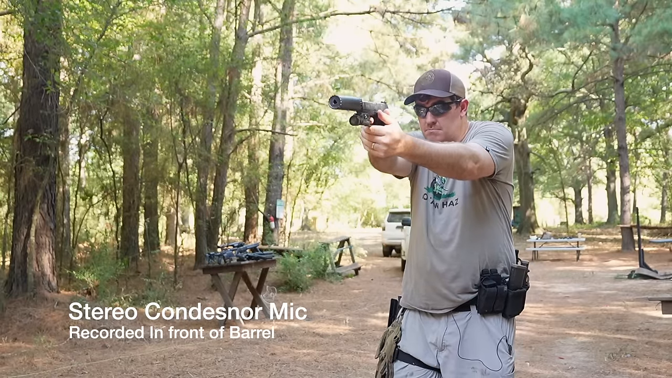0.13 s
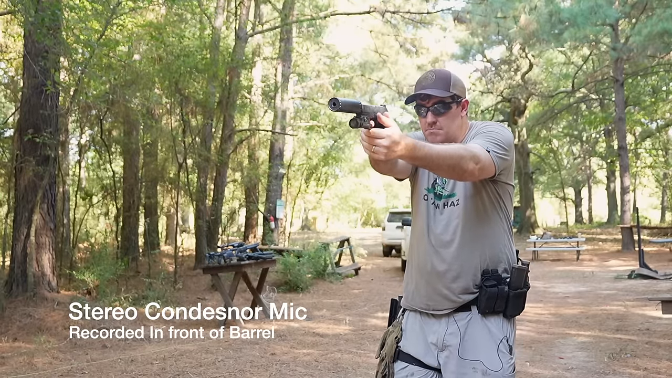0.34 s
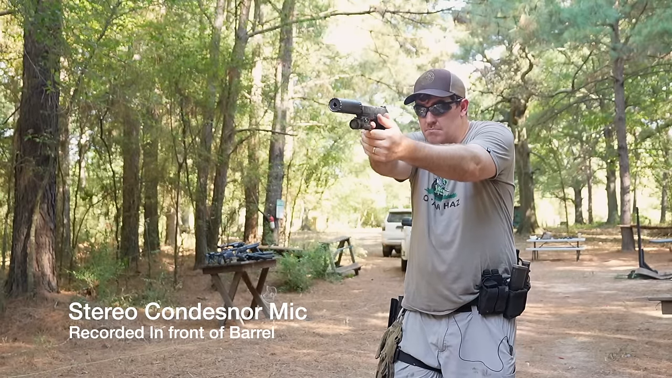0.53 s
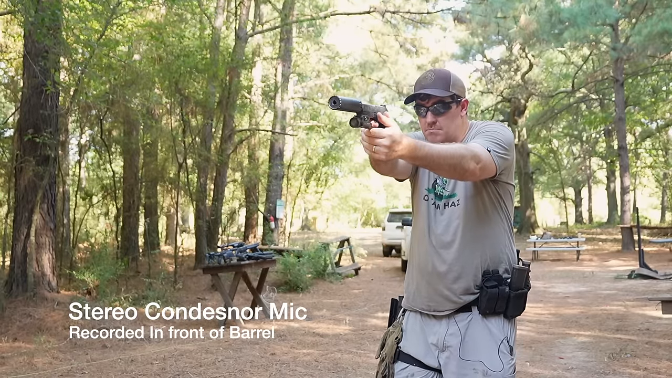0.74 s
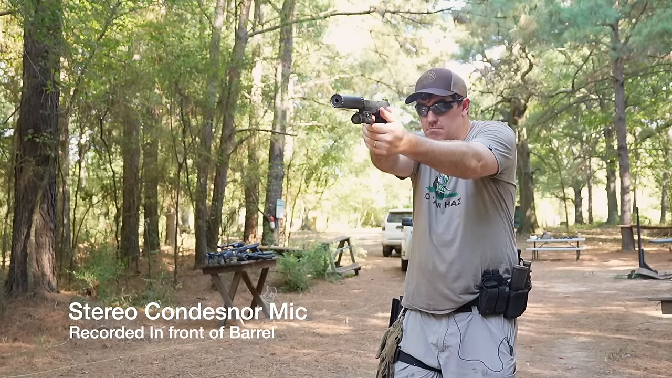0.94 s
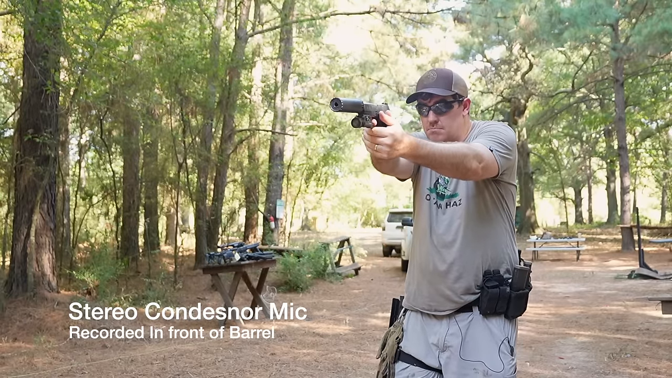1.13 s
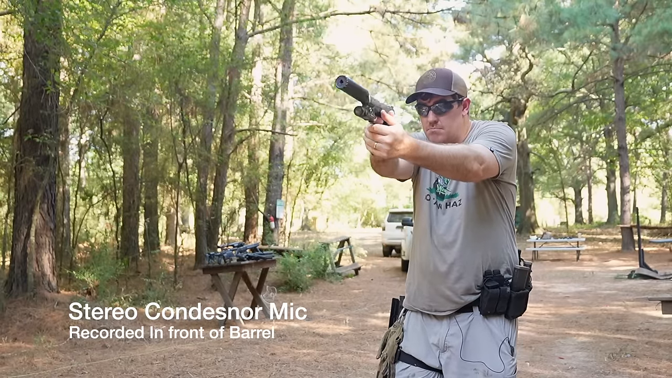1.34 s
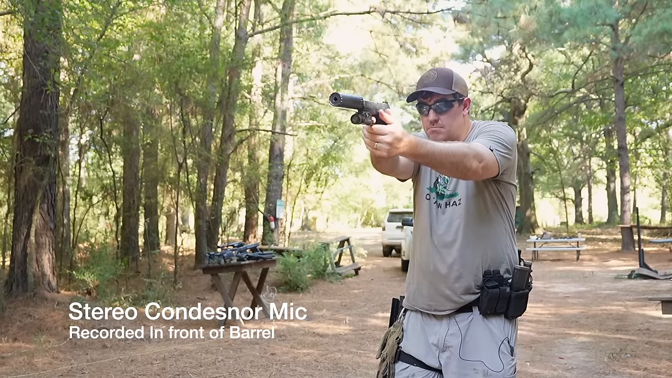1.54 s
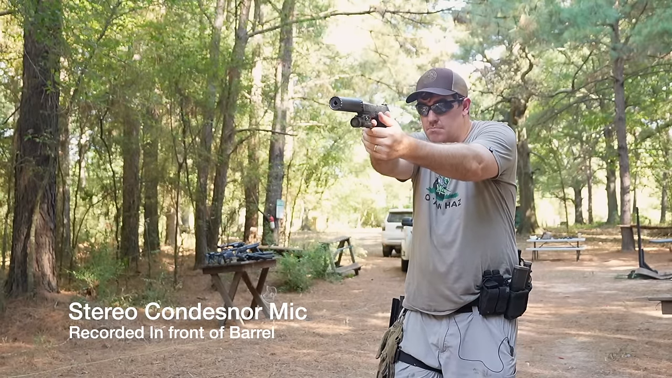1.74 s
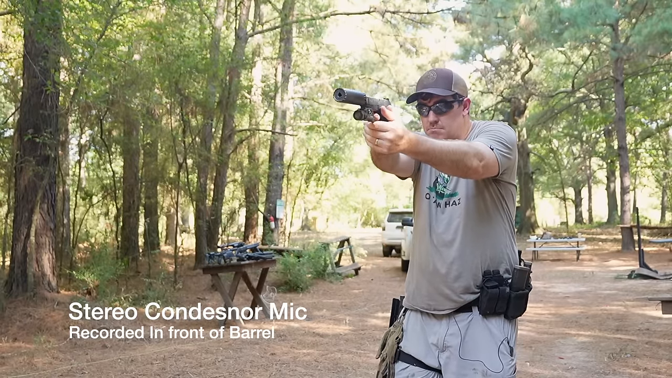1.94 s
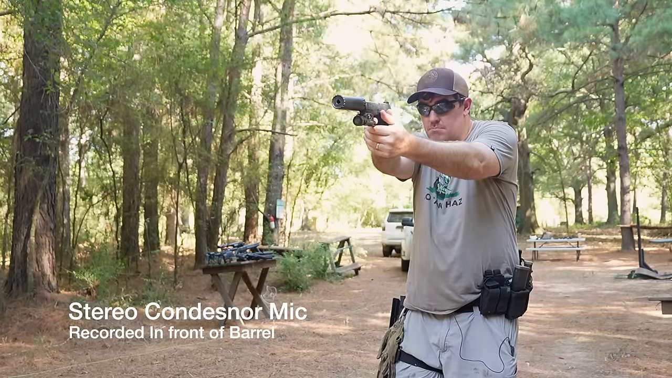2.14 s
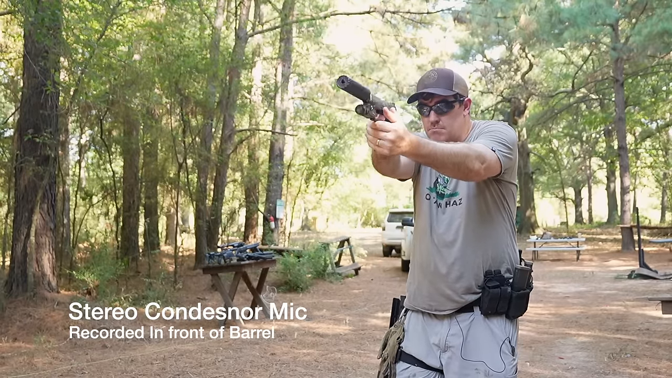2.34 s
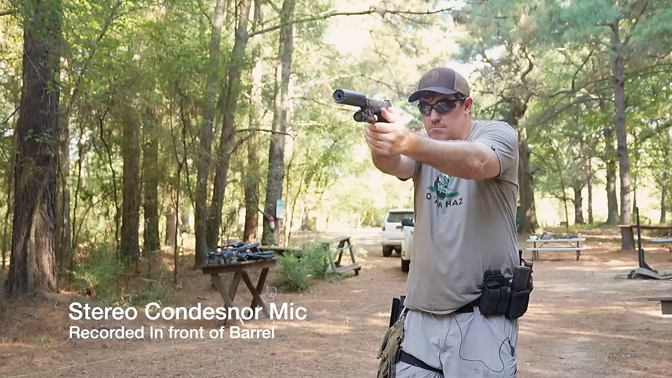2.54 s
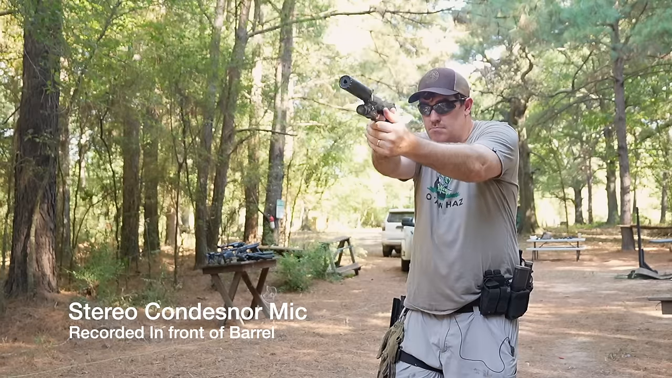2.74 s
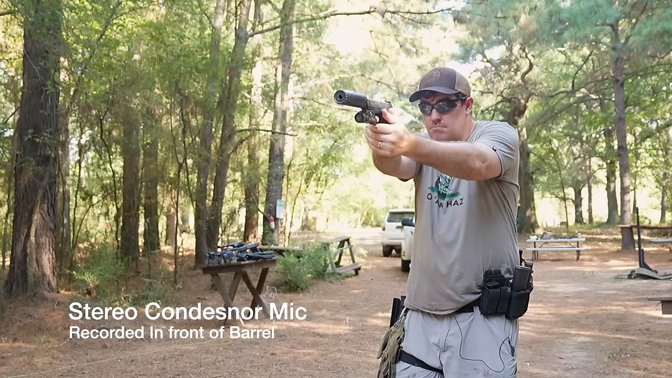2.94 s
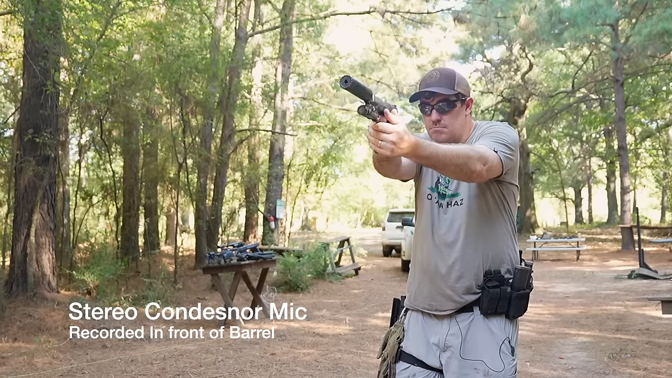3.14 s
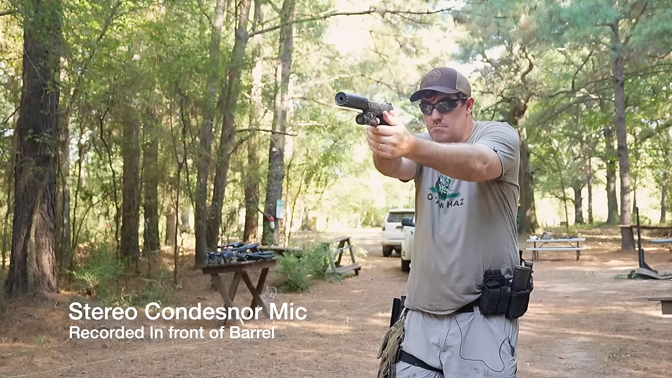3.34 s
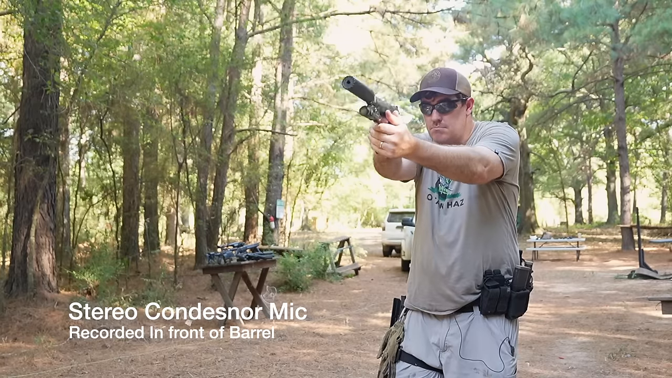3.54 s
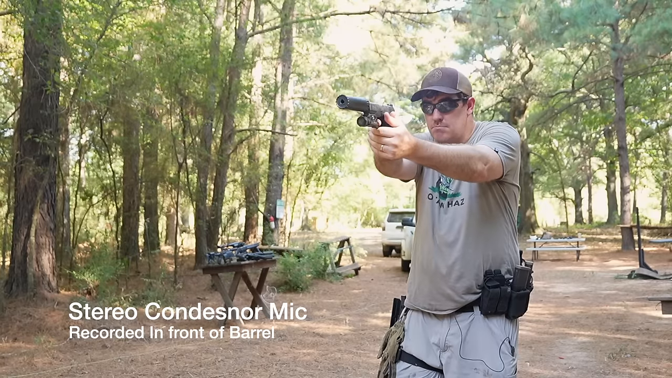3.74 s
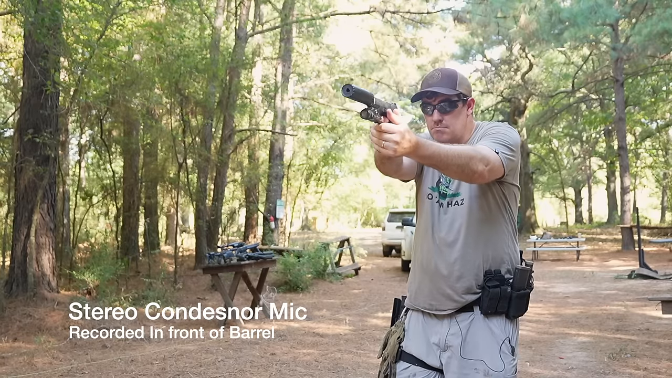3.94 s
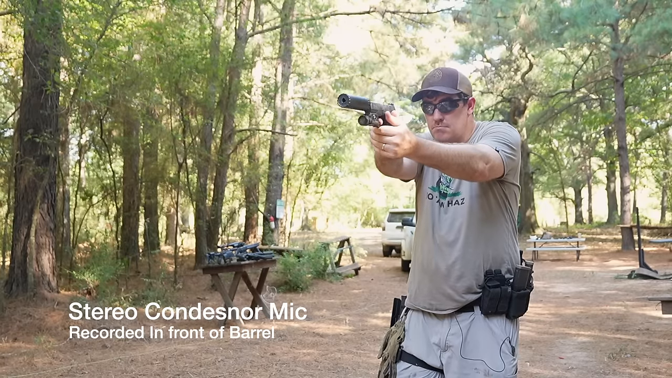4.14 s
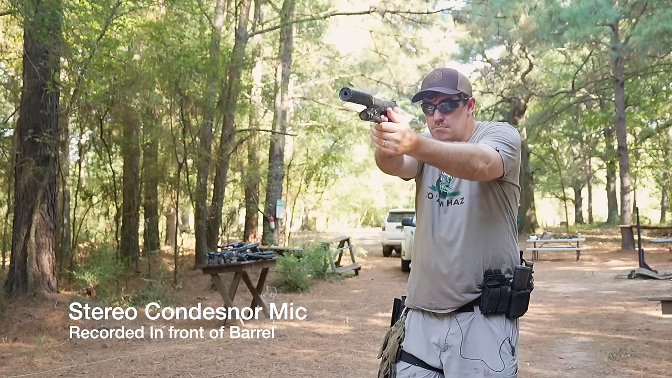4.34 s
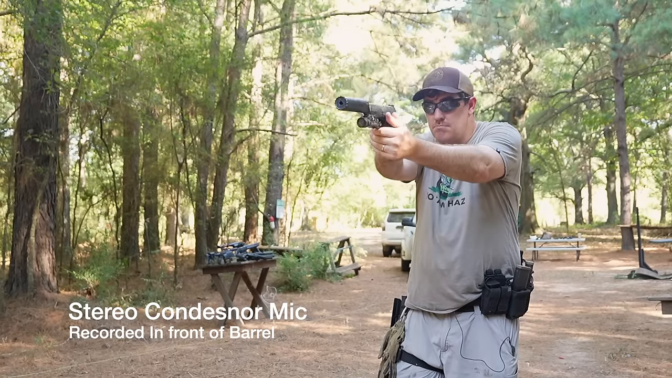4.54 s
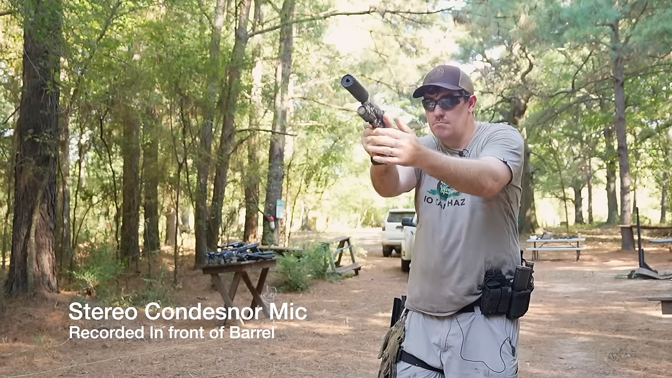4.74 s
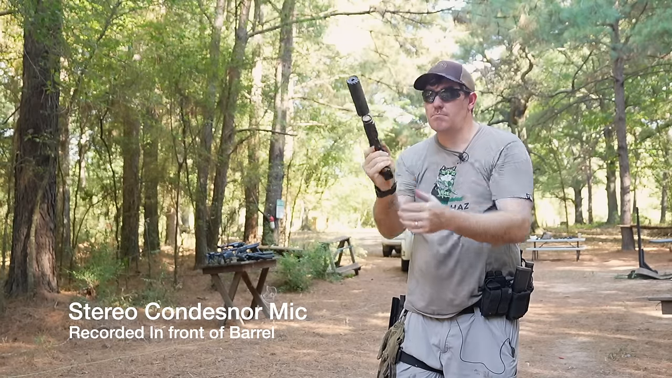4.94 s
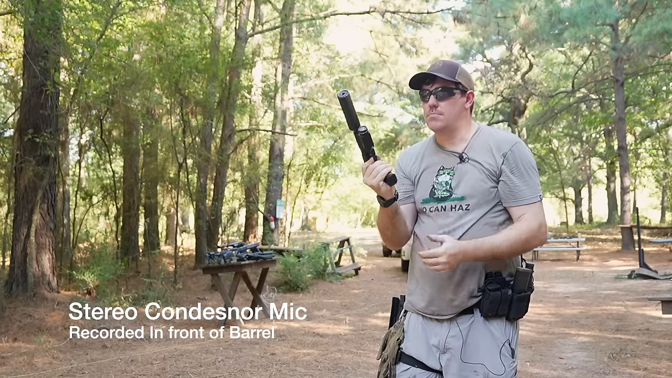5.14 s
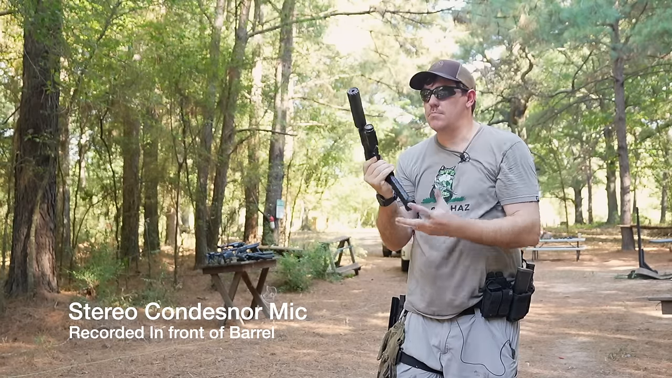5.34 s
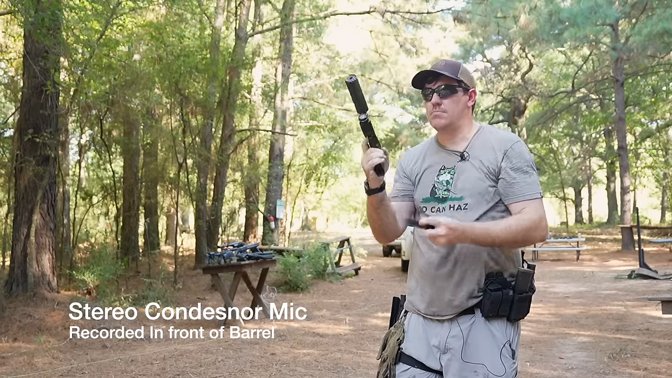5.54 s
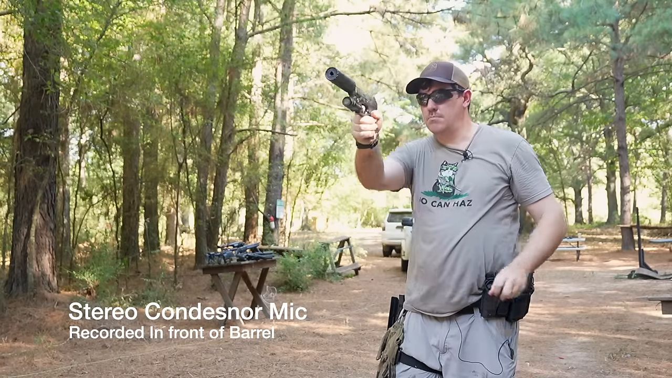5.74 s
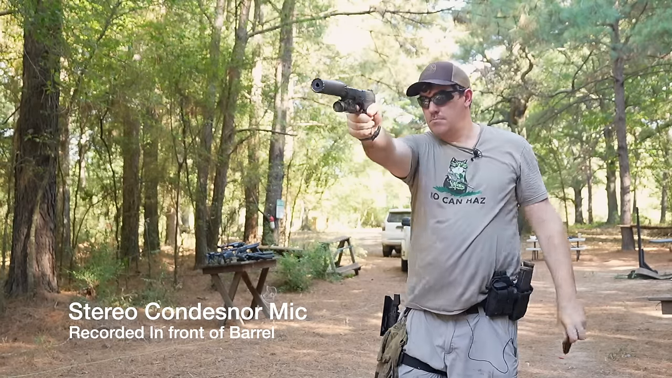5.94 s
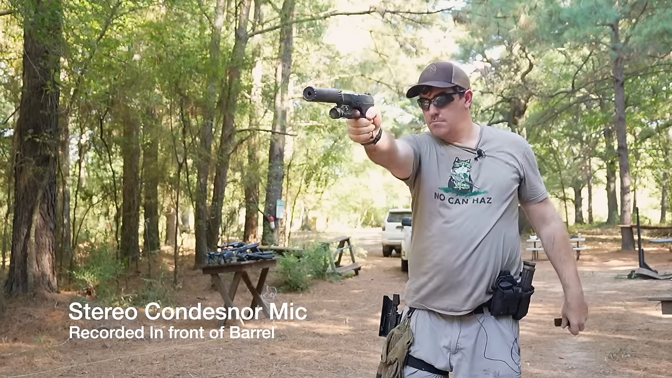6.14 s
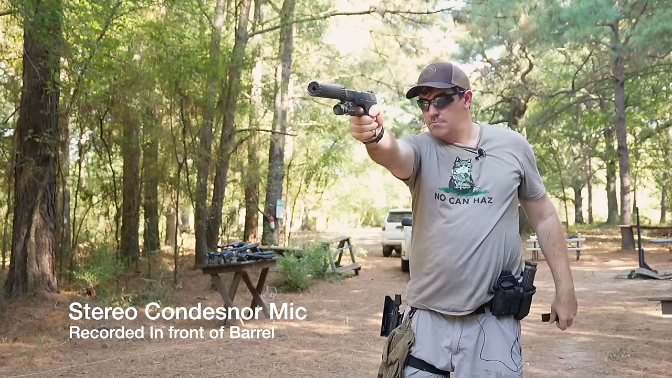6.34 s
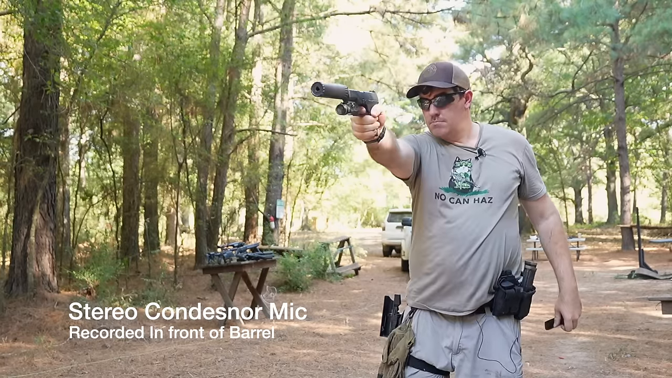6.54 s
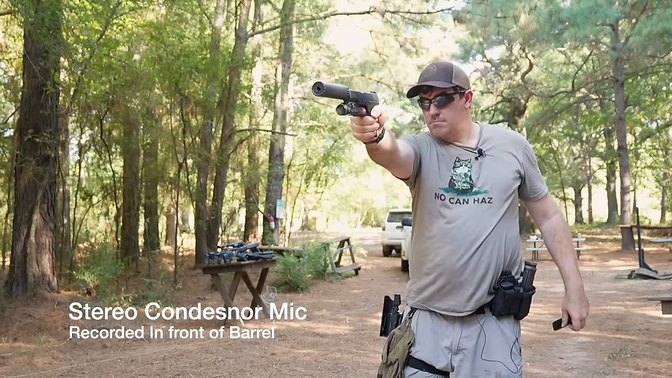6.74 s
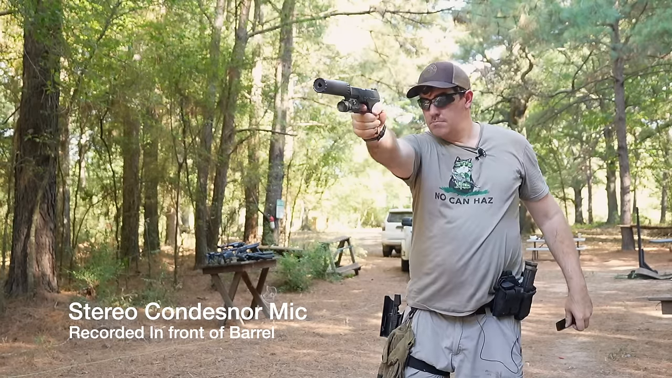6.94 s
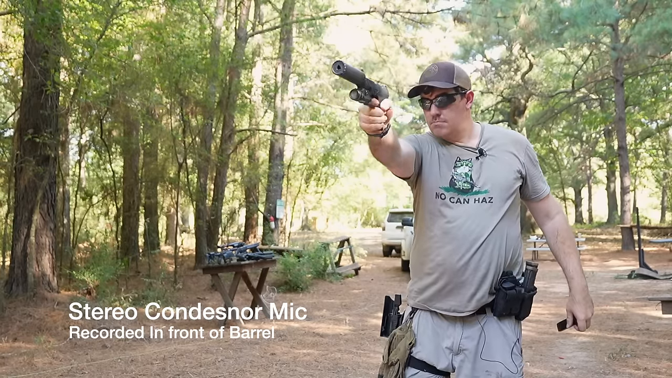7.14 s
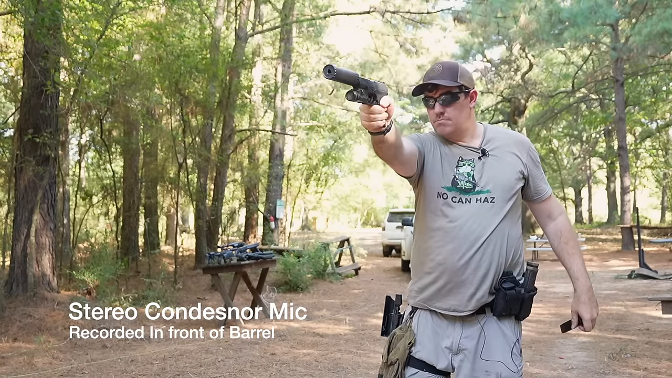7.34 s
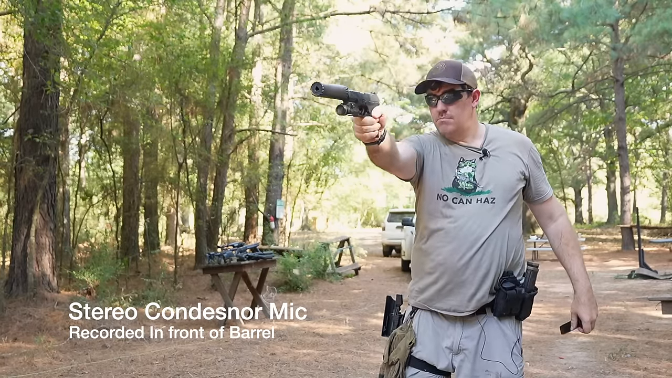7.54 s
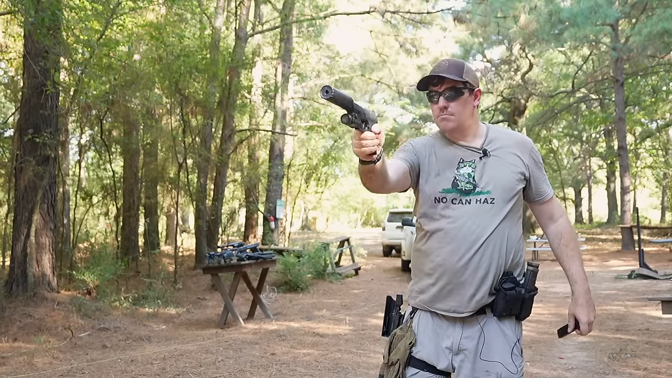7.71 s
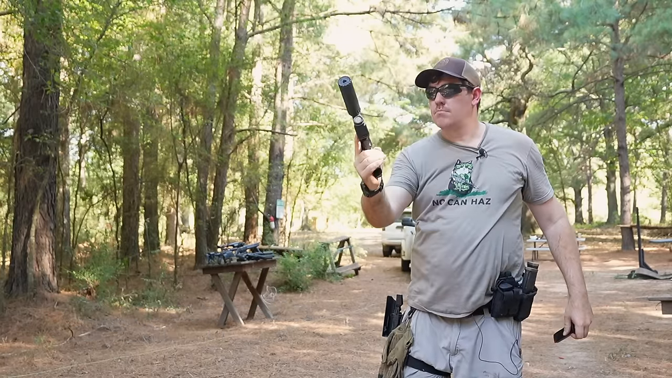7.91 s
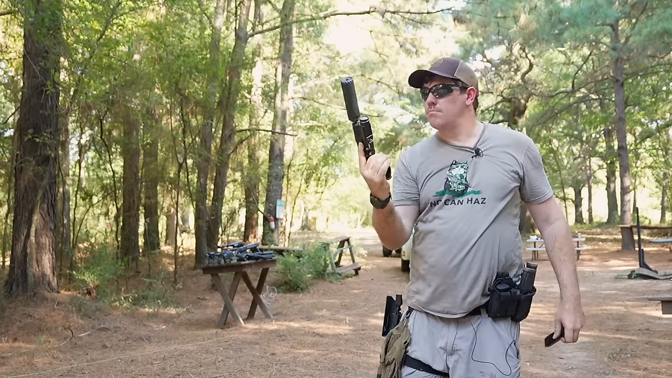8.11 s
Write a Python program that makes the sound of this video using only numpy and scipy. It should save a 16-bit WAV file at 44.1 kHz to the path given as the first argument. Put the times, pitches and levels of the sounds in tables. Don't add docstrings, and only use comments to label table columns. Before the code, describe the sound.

Very close to the microphone, a suppressed pistol fires ten shots in about four seconds. Each is a sharp burst of hissing gas over a short low thump, followed by a metallic slide clack and brief woodland echo. Faint distant impacts and trigger ticks fill gaps. Magazine clicks and a bright clack follow, then quiet with wind and faint birds, and a final shot with small rattles after it.

```python
import sys
import numpy as np
from scipy import signal
from scipy.fft import rfft, irfft
from scipy.io import wavfile
from scipy.ndimage import uniform_filter1d

SR = 44100
rng = np.random.default_rng(int(sys.argv[2]) if len(sys.argv) > 2 else 0)


def magnitude_from_level(level_db):
    exponent = np.asarray(level_db, float) / 20
    return 10 ** exponent


def unload_wav(signal):
    wavfile.write(
        sys.argv[1],
        SR,
        np.round(np.clip(np.atleast_2d(signal).T, -1, 1) * 32767).astype(np.int16),
    )


N = 360441
TIME = np.arange(N) / SR

# (time [s], blast [dB], lead-in puff [dB], echo delay [ms], case song [dB])
SHOTS = [(0.0238, -10, 1, 51, 1), (0.792, -10.5, 4.5, 43, 8), (1.3406, -11.5, 7.5, 50, 2),
         (1.8594, -13, 5.5, 50, 0), (2.322, -10, 1.5, 44, 4), (2.7256, -10.5, 1.5, 51, -7),
         (3.128, -9, -6, 44, -3.5), (3.524, -11, 1, 53, 0), (3.9022, -12.5, -6, 40, 4),
         (4.273, -10, 9.5, 64, 5.5), (7.1134, -11, 7.5, 74, -23)]
# (time [ms], level [dB], hold [ms], t60 [ms])
GAS_PUFFS = [
    (-2.2, -24, 2, 6),
    (0, 5, 1.2, 18),
    (0, 2.5, 9, 22),
    (11, -14, 2, 40),
    (15.5, -11, 1.5, 20),
    (26.5, -21, 1.5, 15),
    (31, -19, 2, 20),
]
# (frequency [Hz], level [dB per Hz])
BLAST_COLOUR = [(120, -22), (200, -10), (329, -12.5), (594, -10.5), (1320, -11), (2160, -8), (4290, -9),
                (6930, -4.5), (14200, -8.5), (15600, -6.5), (16500, -37)]
# (time [s], level [dB])
TRUNK_SLAPS = [(.2559, -41), (.9682, -40), (1.4437, -25), (1.5265, -39), (1.9608, -26), (2.091, -36),
               (2.97, -39), (3.3593, -39), (3.7558, -37), (4.1347, -38), (4.4224, -38), (7.244, -26),
               (7.3246, -39), (7.3734, -39), (7.4936, -46), (7.5481, -49)]
# (thump [dB], muzzle pop [dB])
PUSH = [(-15.5, -22.5), (-22, -23.5), (-12, -30), (-20.5, -21), (-17.5, -28.5), (-8, -25.5), (-10, -24),
        (-8.5, -17.5), (-14, -22.5), (-9.5, -16.5), (-9.5, -22.5)]
PUSH_LAG_MS = [3, 2.5, 0, -.5, -.5, 0, 2, 3, 2, 0, .5]
SWING = [-.17, -.11, .15, .11, .15, .09, .07, -.14, -.12, .25, .17]
CAN_DB = [-23, -22.5, -28, -18.5, -16.5, -12, -22, -20.5, -22.5, -22.5, -22]
STOP_MS = [17.6, 16.1, 17.3, 16.8, 17.4, 17.5, 17.2, 17.3, 17.1, 16.5, 17.5]
# (stop [dB], ground bounce [dB])
STOPS = [(-2, -3), (-2.5, -0.5), (0, 3.5), (2.5, 0.5), (-1, 2.5), (-1.5, -1.5), (2, -0.5), (-2, -3),
         (-5, -3), (-2.5, 4.5), (0.5, -0.5)]
# (time after the stop [ms], level [dB], cut-off [Hz])
STOP_CRACKS = [
    (-3.3, -4, 7000),
    (0.0, 5, 6500),
    (3.5, 5.5, 4200),
]
# (time [s], peak [dB], ring [dB])
RETURNS_HOME = [(0.0624, -5, 1.5), (0.8311, -5, 1.5), (1.3778, -5, -2), (1.8988, -5, 0), (2.362, -4, -4.5),
                (2.7643, -6, -2.5), (3.168, -6, -1), (3.564, -7, 2.5), (3.9427, -8.5, 4.5),
                (4.3120, -5, -2.5), (7.1532, -9.5, -1.5)]
# (time after the return [ms], level [dB], t60 [ms], ring [dB], ring length [x])
LOCK_BLOWS = [
    (0, -2.5, 7.7, -3.5, 0.69),
    (5, -10, 14, -15.5, 0.27),
    (14, -12, 35, -7, 1),
]
# (second blow [ms], last blow [ms], its noise [dB], its ring [dB], ring length [x])
LOCKS = [(5.2, 13.2, 1, 2, .7), (5.1, 13.6, -0.3, 2, .7), (4.2, 13, 1, -8, 1.1), (5.01, 14.2, .1, -6, 1.1),
         (5.01, 13.1, 0.5, -3, 1.6), (5.5, 14.5, 1, -2, 1.5), (5.8, 16, 2.5, -4, 1.4), (4, 13.6, -3, 2, .7),
         (4.5, 13.8, 2, 7, 1.1), (5.2, 14.2, 1.5, -1, 1.8), (5.6, 14.9, 2.1, -7, .6)]
# (frequency [Hz], level [dB per Hz])
STEEL_COLOUR = [(290, -56.5), (500, -24), (2690, -13.5), (4050, -18.5), (8930, -3.5), (10300, -2.5),
                (12300, -17), (15800, -9.5), (16500, -36)]
# (frequency [Hz], level [dB], t60 [s])
SLIDE_MODES = [(11200, -1, 0.01), (10630, 2, 0.028), (7515, -7.5, 0.034), (8300, -6.5, 0.021),
               (9300, -10.5, 0.016)]
# (delay [ms], crack [dB], puff [dB], cut-off [Hz])
OBSTACLES = [
    (32.7, 3, -24, 5000),
    (46.5, -2, -30, 9000),
    (56.5, -1, -30, 5000),
    (61, -1, -30, 5000),
    (74, -1, -28, 4000),
    (91, -3, -28, 6000),
    (114.8, -1, -21, 9000),
    (131.5, -5, -23, 9000),
]
# (frequency [Hz], ground and gear [dB], t60 [s], trunks [dB], t60 [s], deep wood [dB])
WOOD = [(200.8, -33.5, 0.11, -38, 1, -55.5), (529.7, -38.5, 0.13, -39, 0.31, -38.5),
        (996, -39.5, .15, -30, 0.24, -40), (2030, -27, 0.16, -26.5, .5, -38),
        (3500, -20, 0.13, -27, 0.58, -39), (5300, -29.5, 0.21, -26.5, 0.46, -39),
        (8000, -23.5, .15, -22.5, 0.41, -36.5), (12100, -23.5, 0.11, -32, 0.45, -45.5),
        (15900, -36.5, .15, -32, 0.28, -54.5)]
# (echo [dB], tilt [dB per octave], bow [dB per octave squared])
AIM = [(.1, 0, 0.07), (.1, 0.9, 0.4), (.1, 0.23, 0.22), (.1, 0.66, -0.01), (.1, 0.37, 0.35),
       (.1, 0.4, 0.18), (.1, 0.5, 0.16), (.1, 0.34, 0.03), (.1, 0.24, 0.3), (.1, 0, 0.12), (.1, 0.75, 0)]
# (time [s], peak [dB], echo [dB], ringing [dB], sharpness [Q])
LANDINGS = [
    (.511, -37.5, -47.5, -6.5, 9),
    (1.172, -41, -52.5, -4.5, 12),
    (4.702, -52, -75, 11, 11.7),
    (5.0, -53.5, -57.5, -9, 16),
    (5.485, -54.5, -68.5, 2, 6.1),
    (7.658, -40, -52, -4, 30),
]
# (low [Hz], middle [Hz], high [Hz])
HOLLOWS = [
    (1360, 1560, 2700),
    (1130, 1300, 1800),
    (500, 820, 1170),
    (1015, 1520, 2490),
    (1080, 1350, 1700),
    (933, 1400, 1804),
]
# (frequency [Hz], level [dB per Hz])
DIRT_COLOUR = [(240, -45), (400, -4), (909, -3.5), (1080, -3.5), (1380, -2), (2510, -3.5), (2940, -6.5),
               (6670, -17), (9000, -21), (11700, -45.5), (19800, -120)]
# (time [s], peak [dB], centre [Hz], body knock
# [dB])
HANDLING = [(4.8848, -59, 5180, -85), (4.9237, -44.5, 7660, -66), (4.9514, -62, 6000, -85),
            (4.9685, -42, 6000, -50), (4.997, -40, 7100, -63), (5.1294, -47.5, 3000, -64),
            (5.2302, -30, 6900, -54.5), (5.2340, -11.5, 8000, -37), (5.2376, -15, 6770, -54),
            (5.2464, -50, 5570, -58), (5.2704, -47, 5520, -65), (5.414, -47, 3220, -67),
            (5.434, -49.5, 7500, -62), (5.4854, -56, 3100, -66), (5.543, -46, 6000, -71),
            (5.5817, -46, 3120, -72), (5.6314, -60, 7000, -76.5), (5.69, -49, 5000, -60),
            (5.694, -54, 6000, -75), (5.438, -54, 5500, -75), (5.767, -62, 7000, -80),
            (5.7597, -56, 7200, -72.5), (7.5144, -39, 3580, -61), (7.658, -30.5, 6000, -74),
            (7.6724, -30, 4000, -59), (7.7553, -41, 8500, -54), (7.7678, -30, 4260, -58),
            (7.8494, -51, 13100, -60), (7.871, -48, 9000, -60), (7.7722, -41, 7500, -65),
            (7.781, -44, 5000, -65), (7.693, -36, 5000, -65), (5.007, -44, 2500, -62),
            (5.102, -50, 2520, -67), (5.705, -62, 5000, -75), (5.713, -59, 6500, -78)]
# (time [s], level [dB], frequency [Hz], t60 [s])
CASE_RINGS = [
    (5.247, -48, 5550, .04),
    (5.271, -53, 5550, .04),
    (4.974, -50, 9850, .06),
    (7.85, -72, 9950, .25),
    (5.72, -78, 8300, .2),
    (5.768, -76, 8300, .2),
    (6.01, -79, 9600, .4),
    (6.15, -82, 9000, .2),
    (8.08, -76, 9900, .15),
]
# (time [s], level [dB], frequency [Hz], t60 [s])
STRUCK_RINGS = [(.528, -38, 1500, .06), (.511, -36, 2480, 0.029), (7.659, -44, 915, .04),
                (7.659, -39, 1330, 0.035), (7.658, -39, 2700, .02), (7.658, -34, 3430, 0.015),
                (7.658, -37, 6000, .008), (4.705, -38.5, 790, 0.018), (4.705, -45, 520, .02),
                (4.3, -47, 2900, 0.019), (5.69, -57, 5200, .02), (7.871, -50, 4400, 0.018),
                (5.231, -42, 4200, .015), (5.238, -40, 3900, .02), (5.238, -23, 5700, 0.0099),
                (5.234, -30, 7330, 0.017),
                (0.61, -33, 1450, .03), (.511, -36, 1500, .02), (1.173, -37, 1150, .022), (1.173, -38, 2650, .025),
         (4.9685, -43, 3650, .02), (4.9685, -47, 8300, .015), (4.924, -50, 7350, .02),
         (4.924, -55, 4750, .02), (5.543, -54, 7500, .012), (5.69, -57, 7000, .012),
         (5.763, -58, 7200, .015), (5.486, -56, 1150, .02), (5.005, -56, 1030, .12), (5.03, -55, 1000, .1),
         (5.434, -52, 2600, .02), (7.168, -34, 700, .04), (7.77, -54, 920, .15), (7.84, -57, 935, .2),
         (7.93, -57, 950, .2)]
# (time [s], peak [dB])
TRIGGER = [(0.3666, -41), (0.7459, -44), (1.1363, -36), (1.171, -35), (1.3014, -50.5), (1.6945, -47),
           (1.7714, -42), (2.2892, -38), (2.5965, -41), (3.0994, -40), (4.2178, -43.5)]
# (time [s], peak [dB], frequency [Hz])
CHIRPS = [
    (6.5845, -65.5, 2990),
    (6.664, -70, 2810),
    (6.705, -76, 2620),
    (6.737, -70, 2720),
    (6.806, -63, 2820),
    (6.887, -70, 2720),
    (6.608, -75, 2450),
    (6.692, -75, 3100),
    (6.822, -75, 2550),
]
# (start [s], length [s], from [Hz], to [Hz], level [dB])
WHISTLES = [(5.87, .1, 10800, 14200, -82), (5.96, 0.068, 14200, 13400, -83), (5.93, .08, 7800, 6000, -83),
            (6.012, .035, 5400, 4000, -75), (6.03, .025, 4000, 3200, -76), (6.04, .11, 11700, 12100, -87),
            (6.17, .1, 10960, 12200, -83.5), (6.26, .1, 12200, 11420, -87.5),
            (6.22, .07, 13600, 14200, -82), (6.28, .1, 14200, 13000, -82), (6.28, .07, 10300, 9330, -86),
            (6.908, .025, 2800, 4500, -77), (6.97, .07, 4150, 2900, -79.5), (6.655, .025, 3600, 2900, -78),
            (6.732, .02, 3700, 2900, -78), (7.02, .03, 4200, 3900, -79), (6.07, 0.0353, 2900, 3800, -80),
            (6.1, .03, 14200, 13700, -82), (6.29, .04, 13200, 11800, -84), (6.36, .03, 13800, 13000, -85),
            (5.92, .04, 13800, 14100, -81), (6.58, 0.035, 2900, 3700, -76)]
# (start [s], length [s], rumble [dB], flutter [dB])
GUSTS = [(0.319, 0.24, -41, -38.5), (0.565, 0.18, -51.5, -79), (1.917, 0.15, -47, -45),
         (2.086, 0.1, -39, -53), (2.54, 0.14, -48.5, -57), (2.84, 0.2, -42.5, -57),
         (3.247, 0.094, -52, -62), (3.75, 0.2, -54, -64), (4.366, 0.082, -47, -47), (4.579, 0.24, -65, -72),
         (4.884, 0.37, -56, -79), (5.192, 0.15, -52, -65), (5.727, 0.12, -46, -60), (6.045, 0.13, -51, -59),
         (6.203, 0.17, -46, -54), (6.334, 0.16, -57, -57), (6.497, 0.61, -73, -57.5),
         (6.812, 0.15, -58, -75), (7.898, 0.22, -80, -80)]
# (frequency [Hz], level [dB per Hz])
RUMBLE_COLOUR = [(15, 3), (30, 7.5), (60, -9.5), (110, -23.5), (200, -37.5), (400, -56.5), (1000, -110)]
# (frequency [Hz], level [dB per Hz])
FLUTTER_COLOUR = [(15, -12.5), (40, 2.5), (80, -3), (130, -17.5), (180, -26), (250, -44), (400, -61.5),
                  (1000, -110)]
# (start [s], length [s], level [dB])
SOFT_HISS = [
    (5.0, 0.16, -67),
    (5.115, 0.042, -63.5),
    (5.235, .15, -63),
    (5.37, .1, -74.5),
    (7.665, 0.095, -60),
    (7.75, 0.048, -58),
]
# (frequency [Hz], level [dB per Hz])
AIR_COLOUR = [(41, -25.5), (70, -10), (108, -17), (149, -16.5), (289, -26.5), (600, -25), (1370, -34),
              (2530, -39), (5640, -45), (15100, -47.5), (16500, -62)]
# (frequency [Hz], level [dB rms])
HUM = [(60, -63.5), (120, -78.5)]


def coloured(points, size=N):
    hz, db = np.transpose(points)
    bins = np.maximum(np.arange(size // 2 + 1) * SR / size, 1)
    gain = magnitude_from_level(np.interp(np.log(bins), np.log(hz), db))
    x = irfft(rfft(rng.standard_normal(size)) * gain, size)
    return x / x.std()


def add(out, s, piece):
    i = int(round(s * SR))
    out[i:i + len(piece)] += piece[:N - i]


def fade(t60, hold=0., span=.15):
    t = np.arange(int(span * SR)) / SR
    return magnitude_from_level(-60 * np.maximum(t - hold, 0) / max(t60, .001))


def ring(hz, t60):
    fall = fade(t60, span=.3)
    return fall * np.sin(2 * np.pi * hz * np.arange(len(fall)) / SR)


def butter(x, order, hz, kind):
    return signal.lfilter(*signal.butter(order, hz, kind, fs=SR), x)


def resonate_twice(x, hz, q):
    b, a = signal.iirpeak(hz, q, fs=SR)
    return signal.lfilter(b, a, signal.lfilter(b, a, x))


def snap(hz):
    return butter(signal.unit_impulse(300), 2, [500, hz], "band")


def swell(length, edge):
    t = np.arange(int(length * SR)) / SR
    return np.sin(np.pi / 2 * np.clip(np.minimum(t, length - t) / edge, 0, 1)) ** 2


def swells(rows, edge):
    out = np.zeros(N)
    for s, length, db in rows:
        add(out, s, magnitude_from_level(db) * swell(length, edge))
    return out


def gas():
    roar_db, roar_t60_s, split_hz = 8, 0.032, 3280
    front_db, front_hz = 20, [349.7, 3500]
    flow, front = np.zeros(N), np.zeros(N)
    uneven = rng.normal(0, 1.5, (len(SHOTS), len(GAS_PUFFS)))
    for (s, db, lead_db, *_), spread in zip(SHOTS, uneven):
        for (ms, step_db, hold, t60), more_db in zip(GAS_PUFFS, spread):
            puff_db = db + step_db + more_db + lead_db * (ms < -1)
            add(flow, s + ms / 1000, magnitude_from_level(puff_db) * fade(t60 / 1000, hold / 1000))
    for s, db in TRUNK_SLAPS:
        add(flow, s, magnitude_from_level(db) * fade(0.013))
    roar = flow.copy()
    step = butter(signal.unit_impulse(400), 1, front_hz, "band")
    for s, db, *_ in SHOTS:
        i = int(round(s * SR))
        fall = magnitude_from_level(db + roar_db) * fade(roar_t60_s, hold=0.0027, span=.013)
        roar[i:i + len(fall)] = fall
        add(front, s, magnitude_from_level(db + front_db) * step)
    jet = coloured(BLAST_COLOUR)
    low = signal.sosfiltfilt(signal.butter(2, split_hz, fs=SR, output="sos"), jet)
    return roar * low + flow * (jet - low) + front


def pressure():
    thump, swing = np.zeros(N), np.zeros(N)
    t = np.arange(SR // 2) / SR
    push = ring(88.4, 0.037)
    push = push * np.minimum(t[:len(push)] / 0.0051, 1)
    for (s, *_), (db, pop_db), lag_ms, size, can_db in zip(SHOTS, PUSH, PUSH_LAG_MS, SWING, CAN_DB):
        add(thump, s + .002, magnitude_from_level(can_db) * ring(215, 0.047))
        add(thump, s - .0008, magnitude_from_level(pop_db) * ring(323, 0.019))
        add(thump, s + (lag_ms - 1) / 1000, magnitude_from_level(db + 10.5) * push)
        swing_ms = 58 if size > 0 else 24
        add(swing, s + .006, size * np.minimum(t / .008, 1) * np.exp(-(t * 1000 / swing_ms / 1.4) ** 2))
    return thump + butter(swing, 1, 1.05, "high")


def slide_stop():
    out, rise = np.zeros(N), 1 - fade(.006, span=.3)
    for (s, *_), stop_ms, (stop_db, bounce_db) in zip(SHOTS, STOP_MS, STOPS):
        jitter_ms = [.6 * rng.standard_normal(), 0, 0]
        own_db = [3 * rng.standard_normal(), stop_db, bounce_db]
        for (ms, db, hz), late_ms, more_db in zip(STOP_CRACKS, jitter_ms, own_db):
            add(out, s + (stop_ms + ms + late_ms) / 1000, magnitude_from_level(db + 3.5 + more_db) * snap(hz))
        ring_db = -20 + 2 * rng.standard_normal()
        add(out, s + (stop_ms - 1) / 1000, magnitude_from_level(ring_db) * ring(SLIDE_MODES[1][0], .03) * rise)
    return out


def slide_home():
    bounce_ms, bounce_db = 8.6, 3
    bounces, blows, rings = np.zeros(N), np.zeros(N), np.zeros(N)
    rise = 1 - fade(.006, span=.3)
    for (home, db, ring_db), (second_ms, last_ms, last_db, last_ring_db, last_length) in zip(RETURNS_HOME, LOCKS):
        add(bounces, home + bounce_ms / 1000, magnitude_from_level(db + bounce_db + 2 * rng.standard_normal()) * snap(12000))
        detune = rng.standard_normal(len(SLIDE_MODES))
        for k, (_, blow_db, t60, tone_db, length) in enumerate(LOCK_BLOWS):
            at = home + [0, second_ms, last_ms][k] / 1000
            last = k == 2
            shape = rise if last else 1
            more_db = last_db if last else rng.standard_normal()
            add(blows, at, magnitude_from_level(db + blow_db + more_db) * fade(t60 / 1000, hold=0.0012, span=.3) * shape)
            for m, (hz, mode_db, mode_t60) in enumerate(SLIDE_MODES):
                own_db, longer = ring_db + 2 * rng.standard_normal(), 1
                if last and m == 1:
                    own_db, longer = last_ring_db, last_length
                pitch = hz * (1 + (.002 if m == 1 else .02) * detune[m])
                mode = ring(pitch, mode_t60 * length * longer)
                add(rings, at, magnitude_from_level(db + tone_db + mode_db + own_db) * mode * shape)
    return bounces + blows * coloured(STEEL_COLOUR) + rings


def striker():
    out = np.zeros(N)
    for s, *_ in SHOTS:
        tick = butter(rng.standard_normal(int(.15 * SR)), 1, [1500, 8000], "band")
        db = -33 + 6 * (s > 7.)
        add(out, s - .0105, magnitude_from_level(db) * fade(0.019) * tick)
    return out


def tumbling():
    level = np.zeros(N)
    for s, *_, sing_db in SHOTS:
        add(level, s + 0.032, magnitude_from_level(sing_db - 36) * fade(.65, span=1.) * (1 - fade(0.028, span=1.)))
    tone = resonate_twice(rng.standard_normal(N), 5260, 5.5)
    return level * tone / tone.std()


def returns():
    cracks, puffs = np.zeros(N), np.zeros(N)
    uneven = rng.normal(0, 2.5, (len(SHOTS), len(OBSTACLES)))
    for (s, db, *_), spread in zip(SHOTS, uneven):
        for (ms, crack_db, puff_db, hz), more_db in zip(OBSTACLES, spread):
            add(cracks, s + ms / 1000, magnitude_from_level(db + crack_db + more_db) * snap(hz))
            add(puffs, s + ms / 1000, magnitude_from_level(db + puff_db + more_db) * fade(0.022))
    return cracks + puffs * coloured(BLAST_COLOUR)


def handling():
    out = np.zeros(N)
    for s, db, hz, body_db in HANDLING:
        noise = rng.standard_normal(2000) + 2.7 * signal.unit_impulse(2000, 3)
        sizzle = magnitude_from_level(-41 - 45 - .3 * db) * np.diff(noise, n=2, prepend=[0, 0])
        broad = magnitude_from_level(-29 - .4 * db) * butter(noise, 2, 900, "high")
        tick = sizzle + broad + 1.57 * resonate_twice(noise, hz, 1.3)
        add(out, s, magnitude_from_level(db) * tick * fade(.01)[:2000])
        body = ring(760, 0.025) + 0.6 * ring(1730, 0.041)
        add(out, s + .001, magnitude_from_level(body_db) * body * (1 - fade(0.007, span=.3)))
    return out


def small_rings():
    out = np.zeros(N)
    for s, db, hz, t60 in CASE_RINGS + STRUCK_RINGS:
        add(out, s, magnitude_from_level(db) * butter(ring(hz, t60), 2, hz / 2, "high"))
    return out


def trigger():
    level = np.zeros(N)
    for s, db in TRIGGER:
        add(level, s, magnitude_from_level(db - 4.5) * fade(.012))
    return butter(level * rng.standard_normal(N) + 1e-18, 2, 7530, "high")


def wood(click_power):
    echo_db, loss_db_per_ms = 7.5, 0.0816
    spread_s, deep_t60_s, patch_db = 0.11, 2.314, 1.3
    now = click_power * magnitude_from_level(0.5) ** 2
    later = signal.unit_impulse(N) * magnitude_from_level(-16) ** 2
    spread = np.hanning(int(spread_s * SR))
    for s, _, _, ms, _ in SHOTS:
        power = magnitude_from_level(echo_db - loss_db_per_ms * ms) ** 2
        add(now, s + 0.0071, np.array([power]))
        add(later, s + ms / 1000 - spread_s / 2, power * spread / spread.sum())
    delayed = later + 0.11 * now
    clumps = magnitude_from_level(1.5 * uniform_filter1d(rng.standard_normal(N), size=100) * 10)
    white = rng.standard_normal((2, N)) * clumps
    steps = np.arange(0, N + 256, 256)
    shot = np.maximum(np.searchsorted(np.array(SHOTS)[:, 0] * SR, steps) - 1, 0)
    aim_db, tilt, bow = np.transpose(AIM)[:, shot]
    waver = uniform_filter1d(rng.standard_normal((20, len(steps))), size=9, axis=1) * 3
    table, out = np.array(WOOD), 0
    edges = 140 * 2 ** np.r_[0:5:.5, 5:7.1:.25]
    for k, (low, high) in enumerate(zip(edges, edges[1:])):
        hz = np.sqrt(low * high)
        close_db, close, trunk_db, trunk, deep_db = [
            np.interp(np.log(hz), np.log(table[:, 0]), column) for column in table.T[1:]]
        deep = deep_t60_s / (1 + (hz / 6000) ** 2) ** .55
        power = 0
        for source, db, t60 in [(now, close_db, close), (delayed, trunk_db, trunk), (delayed, deep_db, deep)]:
            decay = signal.lfilter([1], [1, -magnitude_from_level(-120 / t60 / SR)], source + 1e-18)
            power = power + magnitude_from_level(db) ** 2 * decay
        octaves = np.log2(hz / 2500)
        shift_db = patch_db * waver[k] + aim_db + tilt * octaves + bow * octaves ** 2
        patch = np.interp(np.arange(N), steps, magnitude_from_level(shift_db))
        band = signal.butter(2, [low, high], "band", fs=SR, output="sos")
        out = out + signal.sosfilt(band, white[k % 2]) * np.sqrt(np.abs(power)) * patch
    return out


def landings():
    span = 1.5
    out, dirt = np.zeros(N), coloured(DIRT_COLOUR, size=SR * 2)
    grain = magnitude_from_level(1.2 * uniform_filter1d(rng.standard_normal(SR * 2), size=400) * 20)
    for k, ((s, db, echo_db, ring_db, q), pitches) in enumerate(zip(LANDINGS, HOLLOWS)):
        noise = np.roll(dirt * grain, 9000 * k)[:int(span * SR)]
        hollow = 0
        for hz in pitches:
            mode = signal.lfilter(*signal.iirpeak(hz, q, fs=SR), noise)
            hollow = hollow + mode * (pitches[0] / hz) ** .7
        noise = butter(noise, 2, 0.61 * pitches[0], "high") + 0.1 * noise
        bright = butter(noise, 2, 3500, "high")
        noise = noise + bright * (2.1 * fade(0.98, span=span) - .7)
        wash = fade(1.92, hold=0.12, span=span) + 0.26 * fade(0.29, span=span)
        wash = magnitude_from_level(echo_db) * wash * (1 - fade(.041, span=span))
        smack = magnitude_from_level(db) * fade(0.016, span=span)
        add(out, s, (smack + wash) * (noise + magnitude_from_level(ring_db) * hollow / hollow.std()))
    return out


def birds():
    out, t = np.zeros(N), np.arange(900) / SR
    warble = uniform_filter1d(rng.standard_normal(N), size=120) * 11
    for s, db, hz in CHIRPS:
        i = int(s * SR)
        pitch = hz * (1.08 - 3.5 * t + 0.04 * warble[i:][:len(t)])
        ragged = magnitude_from_level(db + 3.0 * warble[i + 999:][:len(t)]) * np.hanning(len(t))
        add(out, s, ragged * np.sin(2 * np.pi * np.cumsum(pitch) / SR))
    broken = magnitude_from_level(6.5 * uniform_filter1d(warble[::-1], size=300))
    for k, (s, length, from_hz, to_hz, db) in enumerate(WHISTLES):
        level = swell(length, 0.017)
        below = np.linspace(float(from_hz < to_hz), float(from_hz > to_hz), len(level)) ** 2
        part = slice(9000 * k, 9000 * k + len(level))
        pitch = (max(from_hz, to_hz) - abs(to_hz - from_hz) * below) * (1 + .012 * warble[part])
        add(out, s, magnitude_from_level(db) * level * broken[part] * np.sin(2 * np.pi * np.cumsum(pitch) / SR))
    return out


def soft_hiss():
    colour = [(2500, -29.0), (5000, 0), (7000, 2), (12000, -8.0), (16000, -13.0)]   # (Hz, dB per Hz)
    return swells(SOFT_HISS, .035) * coloured(colour)


def wind():
    gusts, edge_s, breeze_db = np.array(GUSTS), 0.035, -66
    flutter = swells(gusts[:, [0, 1, 3]], edge_s) * coloured(FLUTTER_COLOUR)
    rumble = (magnitude_from_level(breeze_db) + swells(gusts[:, :3], edge_s)) * coloured(RUMBLE_COLOUR)
    return rumble + flutter


def air_and_hum():
    hum = sum(magnitude_from_level(db) * np.sqrt(2) * np.sin(2 * np.pi * hz * TIME) for hz, db in HUM)
    return magnitude_from_level(-67) * coloured(AIR_COLOUR) + hum


def scene():
    small = handling() + small_rings()
    pistol = gas() + pressure() + slide_stop() + slide_home() + striker() + tumbling() + returns()
    far = wood(small ** 2 / 400.) + landings() + birds()
    return np.array([pistol + small + trigger() + far + soft_hiss() + wind() + air_and_hum()])


def top_cut(x):
    return signal.sosfilt(signal.butter(12, 17140, fs=SR, output="sos"), x)


def record(dry):
    release_db_s, squeeze, knee_db = 60.5, 0.2, -12.5
    clip, cutoff_hz = .67, 15700
    level_db = 10 * np.log10(uniform_filter1d(dry[0] ** 2, size=256) + 1e-12)
    held_db = np.maximum.accumulate(level_db + release_db_s * TIME) - release_db_s * TIME
    duck_db = -squeeze * np.maximum(held_db - knee_db, 0)
    x = dry * magnitude_from_level(signal.lfilter([.002], [1, -.998], duck_db))
    x = clip * np.tanh(x / clip)
    cut = signal.cheby2(16, 60, cutoff_hz * 1.025, fs=SR, output="sos")
    return top_cut(signal.sosfilt(cut, x))


dry = scene()
out = record(dry)
unload_wav(out)
```